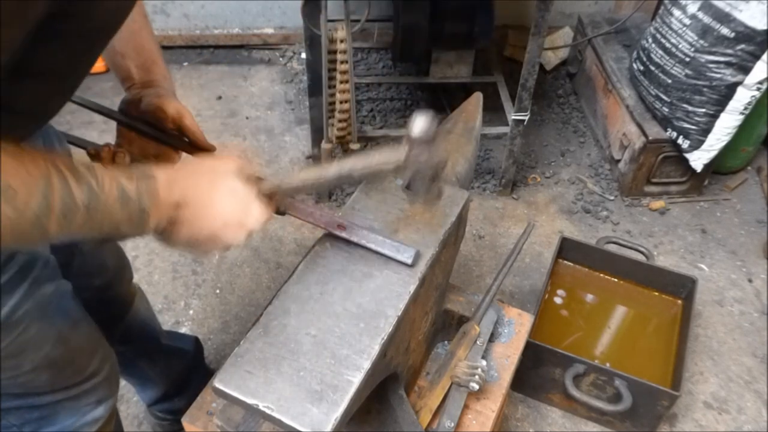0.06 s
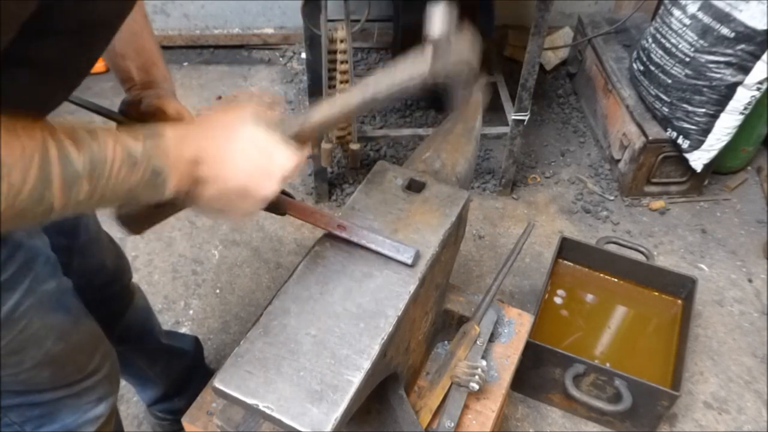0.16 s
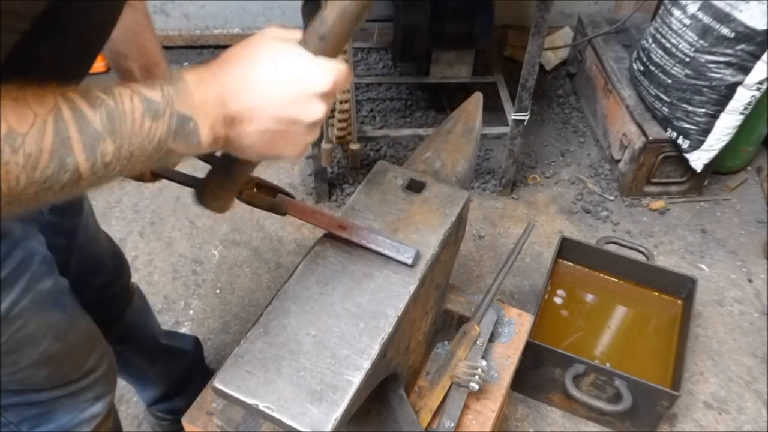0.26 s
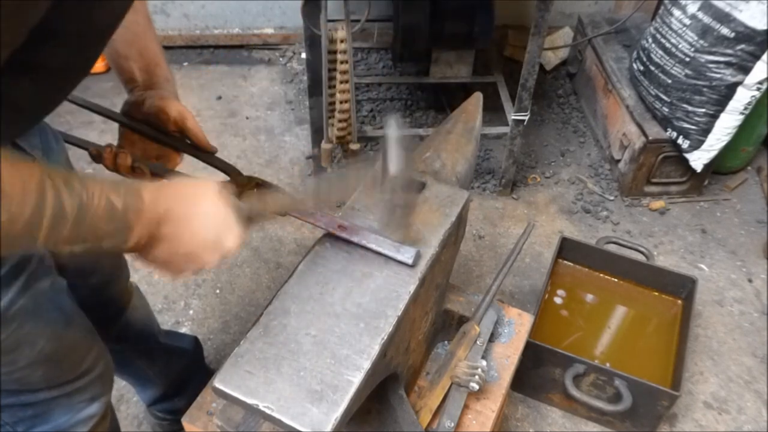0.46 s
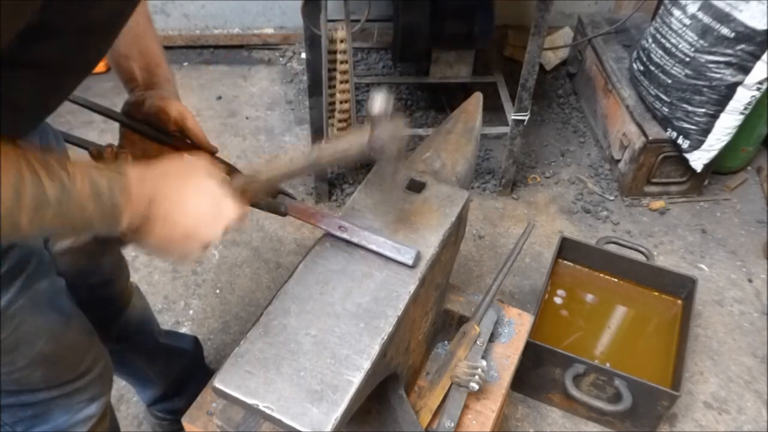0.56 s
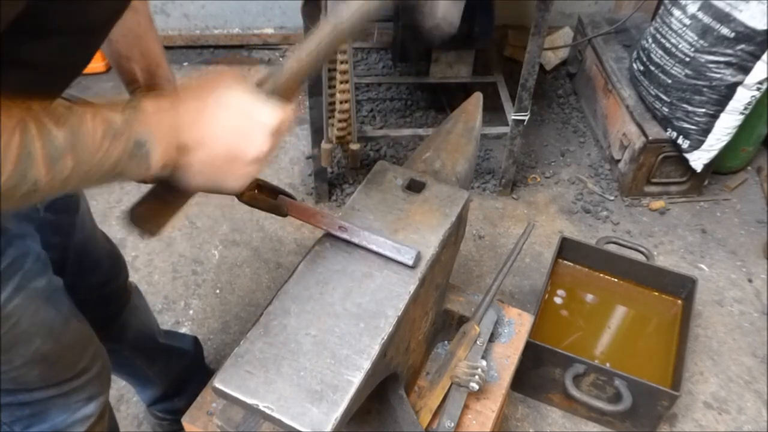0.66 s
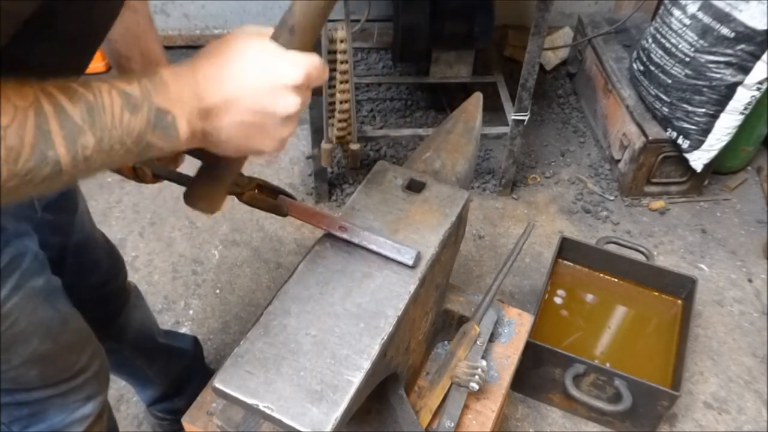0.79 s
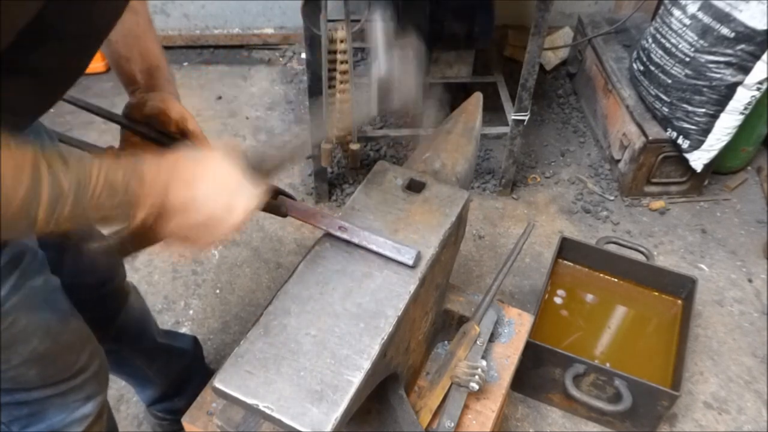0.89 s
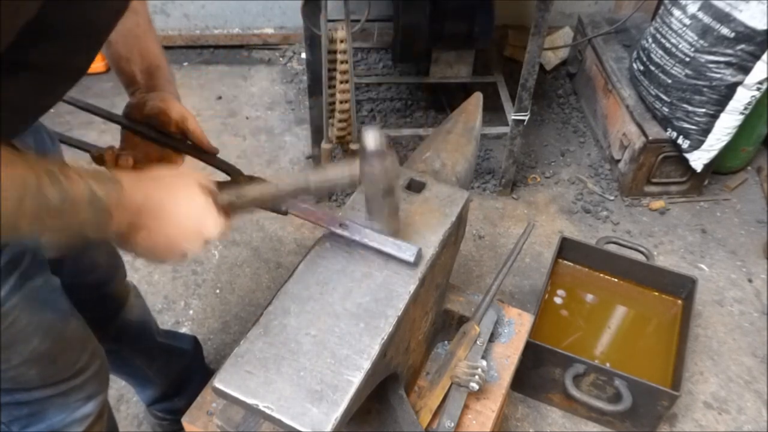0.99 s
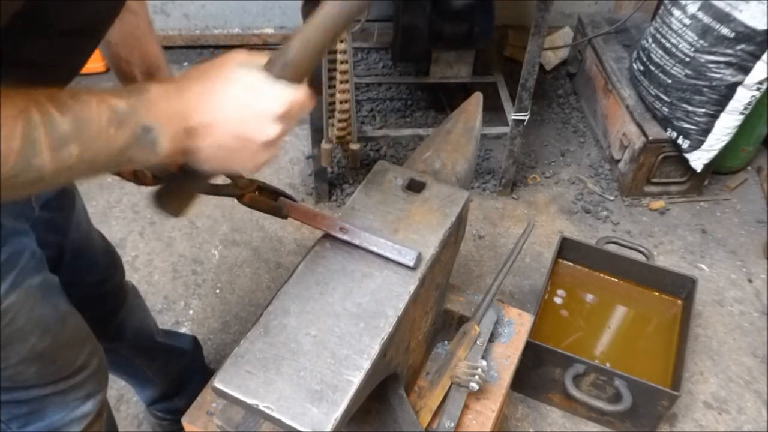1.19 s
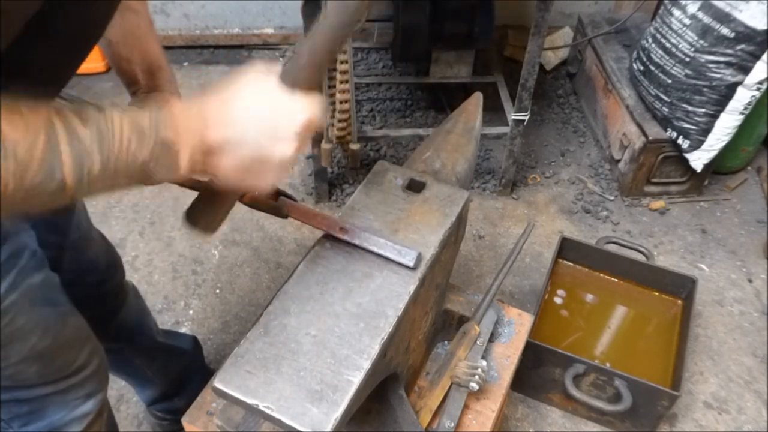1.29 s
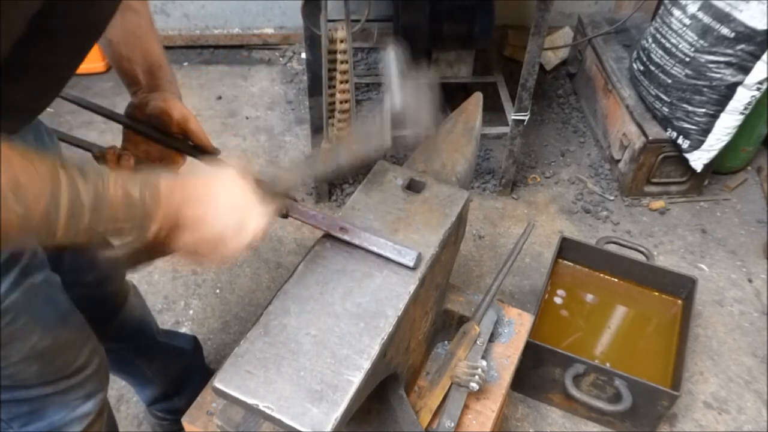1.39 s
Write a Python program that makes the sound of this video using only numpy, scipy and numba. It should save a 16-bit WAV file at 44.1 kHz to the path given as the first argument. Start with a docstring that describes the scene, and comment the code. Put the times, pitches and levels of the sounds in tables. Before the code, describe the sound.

Steady hammer blows on steel over an anvil, bright clanks with thin ringing tails in a workshop

```python
"""The wash and ringing of an earlier blow are still fading as the scene opens in a hard-walled workshop.
Then a hand hammer beats a hot steel bar on an anvil about twice a second: each blow is a snap, a knock of
decaying sines and a short bright clank, then a thud of the stand. Thin ringing lines of the steel and a long
wash of band-split noise follow. Faint ticks and treble rustles fall between blows, over a steady murmur.
A limiter holds each blow down and lets go at a steady rate."""
import sys
import numpy as np
from scipy import signal
from scipy.fft import rfft, irfft
from scipy.io import wavfile
from scipy.ndimage import uniform_filter1d, minimum_filter1d
from numba import njit

SR = 44100
rng = np.random.default_rng(int(sys.argv[2]) if len(sys.argv) > 2 else 0)


def transcribe(signal):
    """Save signal, clipped to [-1, 1], as a 16-bit WAV file at the path in sys.argv[1]."""
    frames = np.atleast_2d(signal).T
    limited = np.clip(frames, -1, 1)
    pcm = np.round(limited * 32767).astype(np.int16)
    wavfile.write(sys.argv[1], SR, pcm)


N = 63945
LEAD = SR // 2  # samples rendered ahead of the scene, so that the earlier blow can ring into it
T = np.arange(N + LEAD) / SR
SCENE_T = T - LEAD / SR  # seconds, zero where the scene opens
OPPOSITE = np.array([[1], [-1]])  # side signal: added on the left, subtracted on the right


def undb(db):
    """Amplitude factor of a level in dB."""
    return 10 ** (np.asarray(db, float) / 20)


def curve(table, hz):
    """Table value at hz, straight lines on a log frequency axis."""
    table = np.array(table, float)
    return np.interp(np.log(hz), np.log(table[:, 0]), table[:, 1])


def fade(t, t60):
    """Exponential decay from t = 0, falling 60 dB in t60 seconds (at least 2 ms)."""
    return (t >= 0) * np.exp(-np.log(1000) * np.maximum(t, 0) / max(t60, .002))


def ring(t, hz, t60, db, turn=0.):
    """One struck mode: a decaying sine, its phase shifted by turn radians."""
    return undb(db) * np.sin(2 * np.pi * hz * t + turn) * fade(t, t60)


# Hammer blows; clank and thud levels are relative to the blow, wash to the blow and WASH_DB:
# (time [s], level [dB], clank pitch [Hz], clank level [dB], clank hold [s], thud level [dB],
#  wash level [dB], wash tilt [dB per octave], striking spot [0, 1 or 2])
BLOWS = [(-.368, -4, 10500, -21, .002, -16, 5.5, -1.1, 2),
         (.1076, 2, 10440, -1.5, 0.00096, -11, -1, -1.22, 0),
         (0.5822, 2.5, 8900, -1.5, 0.0003, -11.5, 0, -0.43, 1),
         (1.0546, 5, 10590, 0, 0.0013, -14, -1.5, 0.56, 2)]
# Short body sounds of bar, anvil and hammer, relative to the blow:
# (pitch [Hz], t60 [s], level at spot 0 [dB], at spot 1 [dB], at spot 2 [dB])
KNOCK_MODES = [(663, 0.04, -15.5, -14, -18.5), (759, 0.022, -15.5, -16.5, -22.5),
               (1860, 0.036, -19.5, -18, -24), (2410, 0.02, -16, -14, -10.5), (3376, 0.0076, -17, -9.5, -5),
               (4246, 0.0062, -19.5, -6, -9.5), (6040, .008, -11.5, -12, -9),
               (6950, 0.0091, -14, -9.5, -5.5), (9500, 0.015, -6, -9.5, -31), (11014, .02, -9.5, -12, -15),
               (12510, 0.0063, -12, -20, -33)]
# Stand and floor, relative to the thud level: (pitch [Hz], t60 [s], level [dB])
THUD_MODES = [(240, .09, -7), (277, .1, 0), (405, .05, -10)]
SNAP_HZ, SNAP_S, SNAP_DB = 1950, 0.00024, 1.5  # SNAP_S: half width of the bell, at 1/e
CLANK_RISE_S, CLANK_T60_S = 0.00046, 0.0066
THUD_LATE_S, THUD_RISE_S = 0.00436, 0.0052  # delay, time constant of the rise


def blow(at, db, clank_hz, clank_db, hold_s, thud_db, spot):
    """Snap, body knock, a clank that sings while the faces touch and is then choked, and a late thud."""
    t = SCENE_T - at
    snap_bell = np.exp(-((t - .0003) / SNAP_S) ** 2)
    snap = undb(SNAP_DB) * np.cos(2 * np.pi * SNAP_HZ * (t - .0002)) * snap_bell
    knock = sum(ring(t, mode[0], mode[1], mode[2 + spot]) for mode in KNOCK_MODES)

    clank_t = t - .0003
    clank_rise = np.clip(clank_t / CLANK_RISE_S, 0, 1)
    choke = fade(np.maximum(clank_t - hold_s, 0), CLANK_T60_S)  # full level until the hold ends
    clank = undb(clank_db) * np.sin(2 * np.pi * clank_hz * clank_t) * clank_rise * choke

    thud_t = t - THUD_LATE_S
    thud = undb(thud_db) * sum(ring(thud_t, *mode) for mode in THUD_MODES)
    thud = thud * (1 - np.exp(-np.maximum(thud_t, 0) / THUD_RISE_S))
    return undb(db) * (snap + knock + clank + thud)


def walk(rate):
    """Random levels held 1 / rate s and smoothed twice into slow glides; spread near 1."""
    step = int(SR / rate)
    levels = np.repeat(rng.standard_normal(len(T) // step + 1), step)
    return 1.3 * uniform_filter1d(uniform_filter1d(levels, step), step)[:len(T)]


# Modes of the ringing steel: (pitch [Hz], t60 [s], time constant of the swell [s])
STEEL_MODES = [(1876, .75, .002), (2565, .9, .002), (3400, .5, .002), (4410, .8, .002), (5588, .45, .002),
               (8035, .45, .002), (8120, .4, .002), (9322, .36, .02), (10055, .36, .002), (10275, .4, .002),
               (10588, .35, .002), (11058, .28, .002), (12238, .32, .002), (12405, .5, .09),
               (12868, .6, .002)]
# One row per steel mode, before swell and waver:
# (level at spot 0 [dB], level at spot 1 [dB], level at spot 2 [dB])
STEEL_LEVELS = [(-37, -40, -42), (-40, -36, -36), (-52, -39, -42), (-50, -44, -40), (-44, -52, -42),
                (-47, -39, -41), (-48, -38, -39), (-35, -28, -28), (-33, -36, -36), (-40, -46, -35),
                (-38, -46, -42), (-40, -29, -28), (-41, -29, -42), (-33, -18, -27), (-60, -52, -57)]
WAVER_DB, WAVER_PER_S = 1.5, 40
STEEL_SIDE = .25  # side amplitude against mid, before its own random walk


def steel():
    """Long thin lines; the echoes of the shop make each one waver, a little differently left and right."""
    out = 0
    quarter_turn = np.array([[0], [np.pi / 2]])  # mid and side start a quarter cycle apart
    for (hz, t60, swell), spot_levels in zip(STEEL_MODES, STEEL_LEVELS):
        line = np.zeros((2, len(T)))
        for at, *_, spot in BLOWS:
            start = int(round(LEAD + at * SR))
            t = T[:len(T) - start]
            line[:, start:] += ring(t, hz, t60, spot_levels[spot], quarter_turn) * (1 - np.exp(-t / swell))
        waver = undb(WAVER_DB * walk(WAVER_PER_S))
        side = STEEL_SIDE * line[1] * walk(WAVER_PER_S) * OPPOSITE
        out = out + waver * (line[0] + side)
    return out


# Stereo width of wash and murmur: (frequency [Hz], side minus mid [dB])
NOISE_SIDE = [(60, -11), (250, -49.5), (700, -15.5), (1500, -8), (6000, -9), (14000, -5)]


def stereo(hz, pair):
    """Left and right from a mid and side pair, as wide as the table says at hz."""
    return pair[0] + undb(curve(NOISE_SIDE, hz)) * pair[1] * OPPOSITE


def bands(colour):
    """Coloured stereo noise, split into overlapping third-octave bands."""
    f = 1 + np.arange(len(T) // 2 + 1) * SR / len(T)  # offset by 1 Hz to keep the log finite
    noise = rfft(rng.standard_normal((2, len(T)))) * undb(curve(colour, f))
    for hz in 40 * 2 ** np.arange(0, 8.9, 1 / 3):
        window = np.cos(np.clip(3 * np.log2(f / hz), -1, 1) * np.pi / 2) ** 2
        yield hz, stereo(hz, irfft(noise * window, len(T)))


# Colour of the wash, before tilt and overall level: (frequency [Hz], relative level [dB])
WASH_COLOUR = [(40, -36.5), (160, -22), (212, -19), (236, -5), (275, 0), (320, -10), (360, -11.5),
               (420, -9.5), (491, -15.5), (620, -14), (873, -16), (1900, -11.5), (2840, -16), (5000, -20),
               (7540, -19), (10300, -10.5), (12100, -15), (13100, -23.5), (14000, -33.5), (16000, -38)]
# Decay of the long wash: (frequency [Hz], t60 [s])
WASH_T60 = [(60, 0.33), (250, 0.82), (700, 0.87), (2000, 0.81), (5000, 0.7), (10000, 0.46), (15000, 0.22)]
WASH_DB, EARLY_DB, EARLY_T60_S = -25, 8, 0.11  # EARLY: a stronger, quicker decay added to the long one
WASH_RISE_S, WASH_RISE_CYCLES = 0.001, 5  # time constant of the rise: the longer of the two
SAME_BELOW_HZ = 1500


def wash():
    """The shop's answer to a blow: dense echoes, each band dying at its own pace.

    The bass builds up late and uses the same noise each time; the treble noise differs from blow to blow."""
    out = np.zeros((2, len(T)))
    parts = list(bands(WASH_COLOUR))
    rms = np.sqrt(np.mean(sum(part for _, part in parts) ** 2))
    for at, db, *_, wash_db, tilt_db, spot in BLOWS:
        start = int(round(LEAD + at * SR))
        t = T[:len(T) - start]
        echo = 0
        for hz, part in parts:
            tilt = undb(tilt_db * np.log2(hz / 2000))
            noise = part[:, :len(t)] if hz < SAME_BELOW_HZ else part[:, start:]
            decay = fade(t, curve(WASH_T60, hz)) + undb(EARLY_DB) * fade(t, EARLY_T60_S)
            rise = 1 - np.exp(-t / max(WASH_RISE_S, WASH_RISE_CYCLES / hz))
            echo = echo + tilt * noise * decay * rise
        out[:, start:] += undb(db + WASH_DB + wash_db) / rms * echo
    return out


# Faint ticks, before panning: (time [s], level [dB], pitch [Hz])
TICKS = [(.402, -60, 12800), (.497, -50, 11300)]


def ticks():
    """Tiny high sines that die within milliseconds."""
    return sum(ring(SCENE_T - at, hz, 0.0085, db) for at, db, hz in TICKS)


# Faint treble rustles between blows: (time [s], length [s], gain on the filtered noise [dB])
RUSTLES = [(0.487, 0.093, -61.5), (0.887, 0.089, -57.5)]
RUSTLE_HZ = 8500, 13300  # band edges


def rustles():
    """Thin band-passed hiss that comes quickly and thins out."""
    band = signal.butter(4, RUSTLE_HZ, "band", fs=SR, output="sos")
    hiss = signal.sosfilt(band, rng.standard_normal((2, len(T))))
    level = 0
    for at, length, db in RUSTLES:
        t = SCENE_T - at
        level = level + undb(db) * np.sqrt(np.clip(t / .01, 0, 1) * np.clip(1 - t / length, 0, 1))
    return (hiss[0] + .4 * hiss[1] * OPPOSITE) * level


# Colour of the murmur, before overall level: (frequency [Hz], relative level per Hz [dB])
SHOP_COLOUR = [(24, -54), (40, -42), (140, -4), (237, -8.5), (831, -21.5), (1370, -10.5), (7540, -26),
               (12100, -29), (16000, -47)]
SHOP_DB = -64  # RMS


def shop():
    """Steady murmur of the forge and workshop air: coloured noise set to a fixed RMS."""
    murmur = sum(band for _, band in bands(SHOP_COLOUR))
    return murmur * undb(SHOP_DB) / np.sqrt(np.mean(murmur ** 2))


PAN_DB = 1.3  # left minus right, direct sound


def scene():
    """Pan the direct sound, add wash, rustles and murmur, and drop the lead."""
    blows = sum(blow(*row[:6], spot=row[8]) for row in BLOWS)
    pan = undb(np.array([[PAN_DB], [-PAN_DB]]) / 2)
    direct = (blows + steel() + ticks()) * pan
    return (direct + wash() + rustles() + shop())[:, LEAD:]


@njit
def hold(x, fall):
    """Peak follower: jumps up, sinks at a steady dB rate."""
    e, out = 1e-9, np.empty(len(x))
    for i in range(len(x)):
        e = max(x[i], e * fall)
        out[i] = e
    return out


MIC_LOW_HZ, TOP_HZ = 120, 16200
LIMIT_DB, RELEASE_DB_PER_S, LOOKAHEAD_S = -2.5, 92.5, 0.0001
CLIP_DB = -5.6  # hard ceiling, ahead of the top cut


def record(dry):
    """The microphone drops the bass, a limiter pulls both channels down, peaks clip and the top is cut."""
    dry = signal.sosfilt(signal.butter(2, MIC_LOW_HZ, "high", fs=SR, output="sos"), dry)
    peak = hold(np.abs(dry).max(0), float(undb(-RELEASE_DB_PER_S / SR)))
    gain = np.minimum(1, undb(LIMIT_DB) / peak)
    # the gain starts to fall just ahead of each peak
    span = max(int(LOOKAHEAD_S * SR), 1) * 2 + 1
    gain = uniform_filter1d(minimum_filter1d(gain, span), span)
    clipped = np.clip(dry * gain, -undb(CLIP_DB), undb(CLIP_DB))
    return signal.sosfilt(signal.ellip(8, .2, 80, TOP_HZ, fs=SR, output="sos"), clipped)


dry = scene()
out = record(dry)
transcribe(out)
```